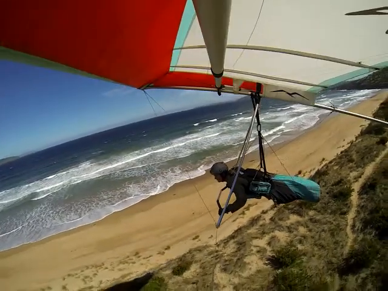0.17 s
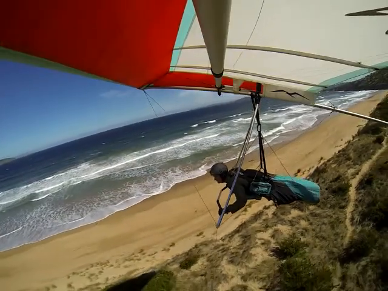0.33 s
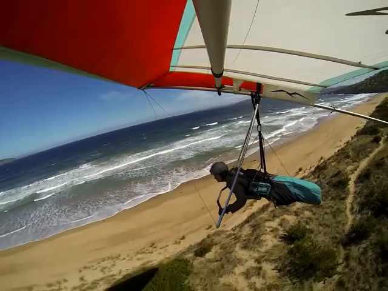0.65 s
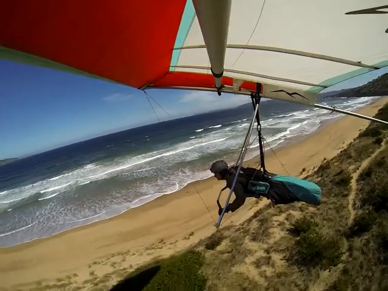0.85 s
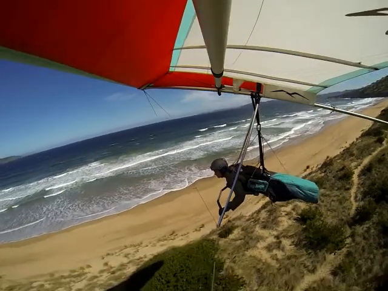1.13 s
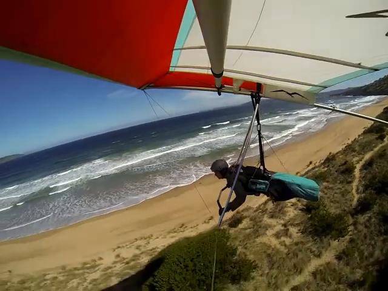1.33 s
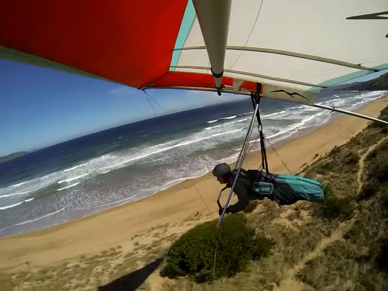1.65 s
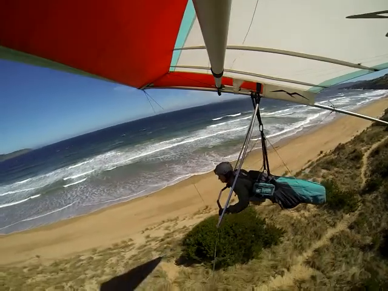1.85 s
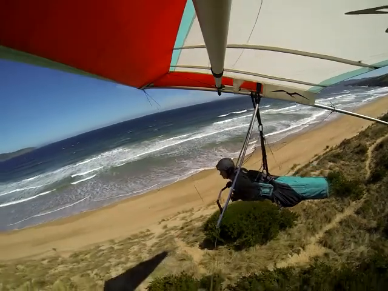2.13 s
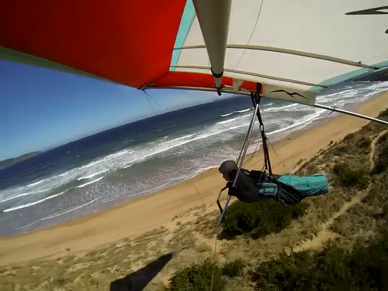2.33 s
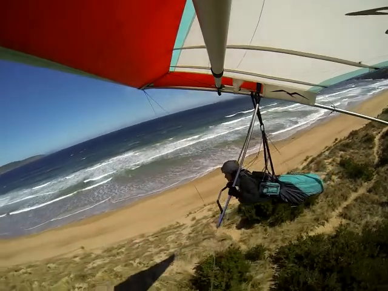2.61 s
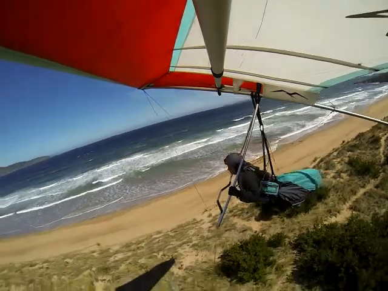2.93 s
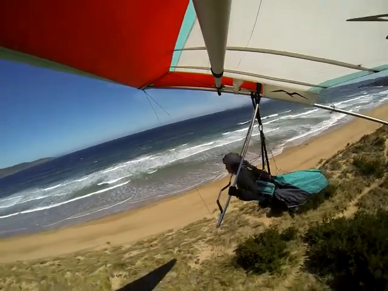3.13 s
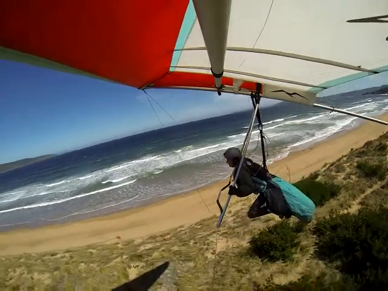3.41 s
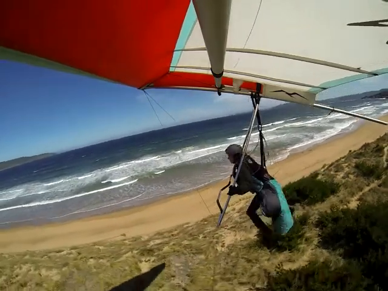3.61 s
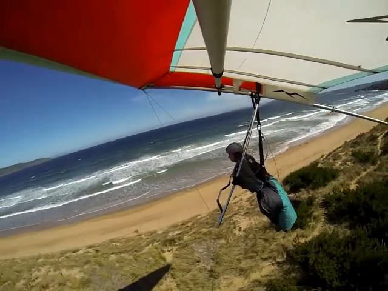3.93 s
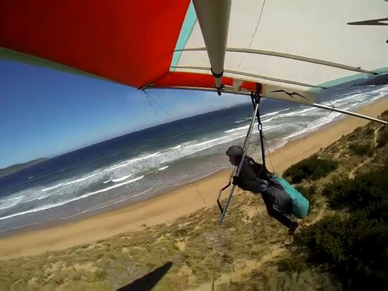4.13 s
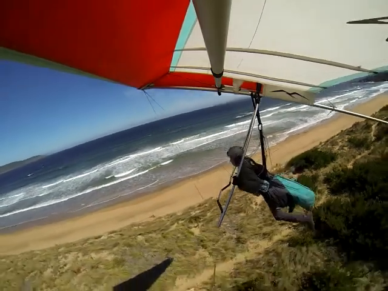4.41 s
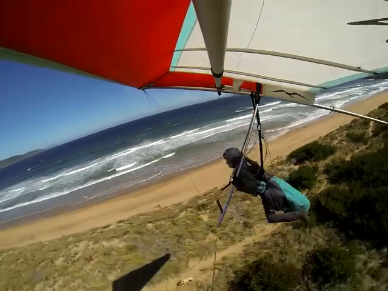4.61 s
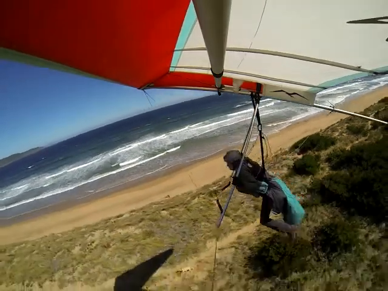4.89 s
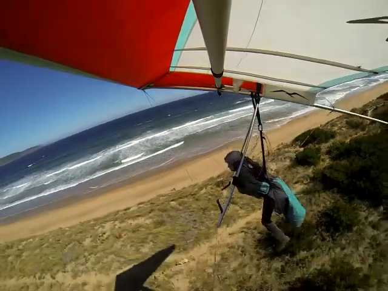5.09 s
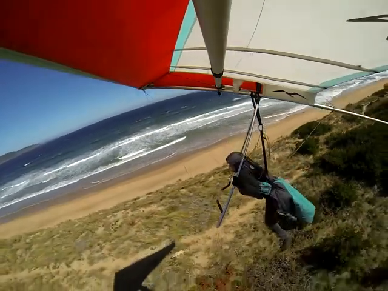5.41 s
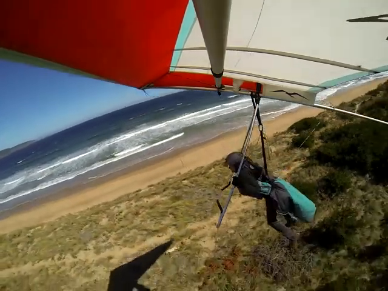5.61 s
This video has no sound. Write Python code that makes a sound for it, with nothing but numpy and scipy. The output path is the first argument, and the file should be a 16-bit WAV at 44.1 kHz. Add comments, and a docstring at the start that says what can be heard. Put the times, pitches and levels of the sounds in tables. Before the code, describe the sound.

A low wavering hum and muffled wind buffeting inside a closed camera housing on a hang glider, with sharp mount clacks and short stick-slip squeaks.

```python
"""Over a beach, a microphone in a closed camera housing rides on the boom of a soaring hang glider.
From the start the airflow swings the frame into a drone, buffets and hisses over the housing, loose
fittings chatter and the electronics whine faintly. From 0.6 s the pilot's shifts knock the mount: blows
ring its modes. From 1.2 s eddies slap the housing and the joint squeaks in short stick-slip strokes, sines
with uneven slips, two of them trailing off in a faint ringing tone; two thin sine chirps pass after 4 s."""
import sys
import numpy as np
from scipy import signal
from scipy.fft import rfft, irfft
from scipy.io import wavfile
from scipy.ndimage import uniform_filter1d, minimum_filter1d, map_coordinates

SR = 44100
rng = np.random.default_rng(int(sys.argv[2]) if len(sys.argv) > 2 else 0)


def put_to_file(sound):
    """Save the sound as 16-bit audio at rate SR, in the file named by the first command-line argument."""
    columns = np.atleast_2d(sound).T  # one column per channel
    safe = np.clip(columns, -1, 1)
    whole_steps = np.round(safe * 32767)
    wavfile.write(sys.argv[1], SR, whole_steps.astype(np.int16))


N = 253575
TIME = np.arange(N) / SR  # [s]

# swing of the frame: (time [s], level [dB])
DRONE_LEVEL = [(0.02, -7.5), (0.19, -7), (0.29, -20), (0.46, -10), (0.56, -25.5), (0.61, -15),
               (0.77, -10.5), (1.0, -23.5), (1.2, -20.5), (1.29, -38), (1.64, -35), (1.74, -20), (1.8, -34),
               (2.1, -21), (2.21, -37), (2.32, -19), (2.52, -19.5), (2.72, -36), (2.79, -18), (2.95, -14),
               (2.99, -32), (3.06, -15), (3.26, -15), (3.34, -40.5), (3.49, -18), (3.61, -17), (3.68, -33),
               (3.82, -30.5), (3.92, -13), (4.2, -18), (4.35, -10), (4.66, -14.5), (4.79, -23.5),
               (5.38, -16), (5.46, -27), (5.73, -13)]
# centre pitch of the swinging frame: (time [s], pitch [Hz])
DRONE_PITCH = [(0.05, 56.93), (0.6, 58.2), (1.02, 53.26), (1.15, 53.65), (1.23, 58.0), (1.58, 59.16),
               (2.06, 55.76), (2.16, 59.3), (3.72, 56.9), (3.81, 54.5), (3.94, 57.16), (5.7, 57.34)]
# slow eddies around the housing, before a common lift: (time [s], level [dB])
EDDY_LEVEL = [(0.05, -29), (0.77, -29), (0.92, -17), (1.21, -22), (1.31, -42), (2.41, -20), (2.54, -32.5),
              (2.87, -18), (3.87, -36), (4.47, -19.5), (4.5, -40), (5.09, -29.5), (5.2, -40), (5.7, -32)]
# airflow over the housing: (time [s], buffeting as gust strength [dB], air hiss before its lift [dB])
AIRFLOW = [(0.02, -38, -61.5), (0.43, -29, -64.5), (0.69, -36.5, -65.5), (1.05, -29.5, -64.5),
           (1.2, -31, -63.5), (1.34, -44, -77), (2.32, -38, -73), (2.45, -34.5, -70), (2.79, -34.5, -66),
           (2.96, -30, -64), (3.15, -27.5, -65), (3.3, -42.5, -73.5), (3.6, -41.5, -72),
           (4.03, -35.5, -71.5), (4.38, -38.5, -68.5), (4.68, -41, -73), (5.62, -42, -72.5),
           (5.73, -39, -67)]
# colour of the slow eddies: (frequency [Hz], level [dB])
EDDY_COLOUR = [(8, -18), (17, 0), (24, 9), (33, -9), (45, -11.5), (80, -35.5), (200, -99)]
# colour of the quicker buffets: (frequency [Hz], level [dB])
BUFFET_COLOUR = [(25, -15), (40, -2), (62, -3), (90, 4), (120, -3), (150, -17.5), (185, -3), (235, -11.5),
                 (285, -4), (330, -17.5), (400, -28.5), (520, -28), (700, -38), (1500, -48.5), (4000, -102)]
# colour of the air hiss inside the closed housing: (frequency [Hz], level [dB])
HISS_COLOUR = [(200, 20.5), (520, 14), (720, 21.5), (1100, 11.5), (1500, 20), (1850, 15), (2200, 6),
               (3000, 2.5), (3900, -1), (4400, -9.5), (5200, -6.5), (7000, -11), (10000, -18),
               (15000, -17.5)]
# colour of the loose fittings: (frequency [Hz], level [dB])
FITTINGS_COLOUR = [(300, -33), (560, -27.5), (720, -2.5), (980, -6.5), (1150, -16.5), (1420, 4.5),
                   (1600, -4), (1850, -13), (2200, -30.5), (3500, -57)]
# bouts of harder chatter: (time of the peak [s], rise [s], fall [s], level [dB])
BOUTS = [(.59, 0.05, .1, -38), (1.17, 0.13, 0.084, -30), (1.84, .04, 0.045, -26), (2.0, .06, 0.087, -40.5),
         (2.92, 0.21, .05, -37.5), (3.18, 0.18, .08, -45.5), (3.35, 0.045, .08, -41),
         (3.8, 0.027, 0.054, -30), (4.47, 0.04, .05, -43.5), (5.12, 0.063, .07, -47.5)]
# play taken up in the mount: (time [s], blow [dB], sharp edge re blow [dB], thud re blow [dB])
KNOCKS = [(0.577, -6.5, -46, -14), (1.053, -26, -36, -20), (1.315, -7.5, -30.5, -22.5),
          (1.323, -24, -7.5, -16.5), (1.793, -29.5, -33, -19), (1.807, -18.5, -41, -18.5),
          (1.974, -13, -48, -21), (2.325, -9.5, -38, -13), (2.38, -23, -46, 0.5), (2.496, -27.5, -5.5, -21),
          (2.807, -21.5, -42, -7.5), (3.06, -27.5, -17, 3.5), (3.275, -8, -38, -15),
          (3.578, -29, -20, -14.5), (3.776, -3, -40, -21), (3.789, -17, -34, -21), (3.844, -22, -42, -2),
          (3.935, -22.5, -36, -16), (4.026, -14, -24.5, -11), (4.189, -33, -34.5, -13.5),
          (4.335, -10, -22.5, -7), (4.413, -6.5, -46, -22), (4.462, -17, -18, -2), (4.497, -31, -17, -29),
          (4.529, -28.5, -12, -12.5), (4.554, -17, -27, -8.5), (4.868, -32, -36, -11),
          (5.024, -21, -24, -24.5), (5.035, -9.5, -38.5, -9.5), (5.07, -6.5, -41.5, -9.5),
          (5.314, -11, -29.5, -10), (5.394, -9, -46, -17), (5.64, -33.5, -41, -9)]
# colour of the mount's hollow clack: (frequency [Hz], level [dB])
CLACK_COLOUR = [(120, -25.5), (280, -4.5), (380, -17), (580, -26.5), (700, 1), (980, -6), (1120, -14.5),
                (1420, 10), (1780, -9), (2230, -23.5), (2550, -19.5), (3050, -47), (6000, -66.5),
                (12000, -72)]
# lasting modes of the mount and boom: (frequency [Hz], 60 dB decay [s], relative level [dB])
MOUNT_MODES = [(731, 0.37, -2), (848, 0.41, -9.5), (930, 0.16, -8.5), (1244, 0.32, -7), (1260, 0.13, -5.5),
               (1570, 0.14, -6.5), (1440, 0.11, -11.5), (1812, 0.14, -2), (1788, 0.35, -8.5),
               (2010, 0.16, -18), (1980, 0.17, -20), (2300, .1, -20)]
# low modes of the boom: (frequency [Hz], 60 dB decay [s], level [dB])
THUD_MODES = [(220, 0.043, -2.5), (280, 0.25, -1), (474, 0.12, -14.5)]
# colour of the sharp edge of hard contacts: (frequency [Hz], level [dB])
SNAP_COLOUR = [(1000, -13), (2700, 18.5), (3600, -0.5), (5700, -3.0), (9000, -17), (15000, -34.5)]
# eddies that slap the housing: (time [s], length [s], level [dB])
SLAPS = [(1.15, 0.1, -24), (2.796, .046, -21.5), (3.055, .055, -8), (3.115, .08, -23), (4.352, 0.041, -26),
         (4.433, 0.024, -18)]
# colour of the slaps: (frequency [Hz], level [dB])
SLAP_COLOUR = [(40, -13), (75, -14), (115, 13), (150, 1), (200, 3), (270, 2.5), (340, -24.5), (600, -41),
               (1500, -82)]
# stick-slip strokes of the joint, and two faint tones (4.607, 5.448 s) that ring on as a squeak trails
# off: (time [s], length [s], mid pitch [Hz], glide [Hz], starting level [dB], swell [dB],
# starting roughness [0-1], half-pitch re tone [dB])
SQUEAK_TONES = [ (1.209, 0.016, 1540, -90.5, -19.5, -3.5, .3, -30),
                (1.229, 0.0076, 1400, -140, -3.5, 6.5, 0.18, -24),
                (1.241, 0.016, 1478, 170.5, -5.5, -1.5, 0.49, -6),
                (1.262, 0.03, 1382, -89, -1.5, -19.5, 0.37, -7.5),
                (1.316, .045, 1505, -0.5, -5.5, -6.5, 0.08, -26.5),
                (1.363, .012, 1363, -60, -16, -8, 0.17, -17),
                (1.806, 0.0085, 1549, 40.5, -2, -8.5, 0.45, -7.5),
                (1.817, 0.038, 1990, 219, -20.5, 0, 0.29, 8.5),
                (1.851, 0.013, 1630, -70.5, -7, -4, 0.47, -9),
                (1.864, .093, 1680, 129.5, -8.5, -5, 0.23, -3.5),
                (1.975, 0.037, 1730, -21, -13.5, -23, 0.04, -16),
                (2.496, 0.0087, 1427, -33, -17.5, -10.5, 0.11, -11.5),
                (2.812, .055, 1446, 79, -34, -8.5, 0.28, -19), (2.915, 0.036, 1496, -77, -28, 4, .55, -5.5),
                (3.108, 0.035, 1400, -2.5, -20, -13.5, 0.28, -18),
                (3.278, 0.025, 1424, 41.5, -5, -2.5, 0.48, -15.5),
                (3.306, 0.0241, 1472, 40.5, -0.5, -18.5, 0.07, -29),
                (4.027, 0.0091, 1375, 0.5, -3, -7.5, .14, -19),
                (4.04, 0.059, 1400, -0.5, -18, -7, 0.18, -17),
                (4.414, .03, 1418, -50, -14, -9.5, 0.38, -3.5),
                (4.461, 0.01, 1345, -71, -1, -5.5, 0.32, -27), (4.477, 0.015, 1360, 29, -4, -7.5, 0.2, -32),
                (4.528, 0.011, 1341, -100, -14, -15, 0.5, -33.5),
                (4.558, .012, 1428, -100, -22.5, -2.5, .6, -16),
                (4.571, 0.032, 1325, 171, -14.5, -9.5, 0.38, -32.5),
                (4.607, 0.13, 1257, 11.5, -42, -15, 0, -27),
                (5.036, 0.014, 1305, -51.5, -3.5, -6.5, 0.39, -28.5),
                (5.053, .026, 1385, 20.5, -16, 3.5, .8, -8.5), (5.089, 0.0098, 1355, 40, -8.5, -4, .6, -13),
                (5.106, 0.032, 1342, 62.5, -9.5, -5.5, .6, -15),
                (5.138, 0.021, 1377, -38.5, -4, -10, 0.19, -11),
                (5.316, 0.07, 1394, -8.5, -7.5, -24.5, 0.28, -19), (5.402, .021, 1342, 34, -17, 1, .7, -7),
                (5.426, 0.013, 1906, -33, -28.5, -1.5, 0.12, 6.5),
                (5.437, .011, 1425, -2, -28, -10.5, 0.51, 12), (5.448, 0.063, 1870, -24, -56, -8, 0, 19.5)]
# colour of the rubbing faces: (frequency [Hz], level [dB])
GRIT_COLOUR = [(1500, -20.5), (2800, 3.5), (3900, 5), (4500, -9.0), (5800, -4), (7000, -21), (12000, -36.5)]
# thin chirps: (time [s], length [s], first pitch [Hz], last pitch [Hz], level [dB])
CHIRPS = [(4.064, 0.049, 5450, 5270, -53), (4.41, 0.02105, 5567, 5633, -54)]

CRUISE_DB = -37  # gust strength in steady flight
# level in steady flight [dB] and growth with the gust [dB per dB]
BUFFET_DB, BUFFET_GROWTH = -32, 1.12
RATTLE_DB, RATTLE_GROWTH = -53, .8
PICTURE_RATE_HZ, WHINE_HZ = 47.95, 6476
REBOUND_S, REBOUND_DB = 0.01, -15.5  # longest delay and relative level of a knock's one bounce
END_CLACK_DB = -16  # clack at the end of a squeak tone, re its level there
TONE_ATTACK_S, TONE_RELEASE_S = 0.006, .004
SAG_S, SAG_SHARE = .007, .07  # share by which the pitch of a long squeak tone sags at its end
FULL_SAG_S = 0.057  # shorter tones sag in proportion to their length
FREEING_S = 0.082  # the grip loosens as the joint slides: the roughness dies away
HALF_FADE_DB_PER_S, HALF_LAST_S = 63, 0.052  # the half pitch fades and then stops
RATCHET_HZ, RATCHET_DB = 55, 5.5  # mean rate and full-roughness depth of the jerks that throb the squeak
TOP_HZ = 15800


def undb(db):
    """Decibels to gain."""
    return 10 ** (np.asarray(db) / 20)


def unit(x):
    """Scale to rms 1."""
    return x / np.sqrt(np.mean(x ** 2))


def curves(table):
    """The columns of a table, joined by straight lines in time."""
    times, *columns = np.transpose(table)
    return [np.interp(TIME, times, column) for column in columns]


def walk(rate):
    """Smooth random wander of rms 1, with rate new values a second."""
    values = rng.standard_normal(N // 8)
    return unit(map_coordinates(values, [TIME * rate], order=3, mode="wrap"))


def response(colour):
    """Causal, minimum-phase impulse response with the given (Hz, dB) colour."""
    hz, db = np.transpose(colour)
    size = 16384
    grid = np.maximum(np.arange(size // 2 + 1) * SR / size, 1)
    gain = undb(np.interp(np.log(grid), np.log(hz), db))
    cepstrum = irfft(np.log(gain))
    # folding the cepstrum onto positive time puts the energy as early as it can be
    cepstrum[1:size // 2] *= 2
    cepstrum[size // 2 + 1:] = 0
    return irfft(np.exp(rfft(cepstrum)))


def through(x, impulse):
    """Pass a sound through an impulse response."""
    return signal.fftconvolve(x, impulse)[:N]


def noise(colour):
    """Coloured noise of rms 1."""
    return unit(through(rng.standard_normal(N), response(colour)))


def steady(x, span_s):
    """Even out the swells of a noise that last longer than span_s."""
    power = uniform_filter1d(x ** 2, max(int(span_s * SR), 2))
    return x / np.sqrt(power + 1e-9)


def ticks(rate, scatter_db):
    """Random tiny impacts of uneven size, rate a second on average, rms 1."""
    hits = rng.random(N) < rate / SR
    size = rng.standard_normal(N)
    scatter = undb(scatter_db * np.clip(rng.standard_normal(N), -2, 2))
    return unit(hits * size * scatter)


def resonance(x, hz, width_hz):
    """One resonance, gain 1 at its centre."""
    return signal.lfilter(*signal.iirpeak(hz, hz / width_hz, fs=SR), x)


def ringing(modes, t):
    """Decaying sines of a table of modes."""
    return sum(undb(db - 60 * t / t60) * np.sin(2 * np.pi * hz * t) for hz, t60, db in modes)


def drone():
    """Shed vortices keep one mode of the frame swinging; its pitch wanders slightly."""
    (level_db,), (hz,) = curves(DRONE_LEVEL), curves(DRONE_PITCH)
    phase = 2 * np.pi * np.cumsum(hz * (1 + .012 * walk(13))) / SR
    swing = unit(np.sin(phase) + undb(-38.0) * np.sin(3 * phase))
    return undb(level_db + 1.9 * walk(16)) * swing


def airflow():
    """Gust strength above steady flight and level of the hiss before its lift, both in dB."""
    buffet_db, hiss_db = curves(AIRFLOW)
    return buffet_db - CRUISE_DB, hiss_db


def eddies():
    """Slow eddies shake the housing: low noise with a wandering level."""
    level_db = curves(EDDY_LEVEL)[0] + 1.0 + 3.7 * walk(12)
    return undb(level_db) * steady(noise(EDDY_COLOUR), .1)


def buffets():
    """Quicker buffets shake the housing harder as the gust grows."""
    gust_db, _ = airflow()
    level_db = BUFFET_DB + BUFFET_GROWTH * gust_db + 1.3 * walk(14)
    return undb(level_db) * steady(noise(BUFFET_COLOUR), .06)


def hiss():
    """Turbulent air hisses over the closed housing, which muffles its treble."""
    _, hiss_db = airflow()
    return undb(hiss_db + 19.5 + 1.0 * walk(40)) * noise(HISS_COLOUR)


def rattle():
    """Loose fittings chatter all the time, harder in gusts and in a few bouts that swell and die."""
    gust_db, _ = airflow()
    strength = undb(RATTLE_DB + RATTLE_GROWTH * gust_db + 1.5 * walk(12))
    for peak_s, rise, fall, db in BOUTS:
        width = np.where(TIME < peak_s, rise, fall)
        strength = strength + undb(db) * np.exp(-((TIME - peak_s) / width) ** 2 * 2)
    impacts = ticks(rate=810, scatter_db=0.0)
    return strength * steady(through(impacts, response(FITTINGS_COLOUR)), 0.19)


def whine():
    """The electronics sing a tone and its octave faintly in bursts, once for each picture."""
    _, hiss_db = airflow()
    burst = np.maximum(np.sin(2 * np.pi * PICTURE_RATE_HZ * TIME), 0)
    phase = 2 * np.pi * np.cumsum(WHINE_HZ * (1 + 0.0012 * walk(300))) / SR
    return undb(hiss_db - 1.0) * burst * (np.sin(phase) + np.sin(2 * phase))


def mount(ring_db, shiver_db, shiver_t60):
    """The mount's answer to a blow: a hollow clack of peak 1, lasting modes and a shiver of loose parts."""
    clack = response(CLACK_COLOUR)
    # bending waves spread out on their way along the boom, so the clack takes a few cycles to build
    clack = clack - 2 * resonance(clack, hz=1580, width_hz=2200)
    clack = clack / np.abs(clack).max()
    t = TIME[:len(clack)]
    dying_noise = rng.standard_normal(len(t)) * undb(-60 * t / shiver_t60)
    shiver = signal.fftconvolve(dying_noise, clack)[:len(t)] / np.linalg.norm(clack)
    return clack + undb(ring_db) * ringing(MOUNT_MODES, t) + undb(shiver_db) * shiver


def knocks(body):
    """Play taken up in the mount clacks and rebounds; hard contacts add an edge, heavy ones a boom thud."""
    blows, shoves, edge = np.zeros((3, N))
    for start, blow_db, edge_db, thud_db in KNOCKS:
        rebound = start + REBOUND_S * rng.uniform(.8, 1.0)
        for s, db in (start, blow_db), (rebound, blow_db + REBOUND_DB):
            i = int(s * SR)
            blows[i] += undb(db)
            shoves[i] += undb(db + thud_db)
            age = TIME[:SR // 20] / 0.0011  # the edge peaks 1.1 ms after contact
            edge[i:i + len(age)] += (undb(db + edge_db) * age * np.exp(1 - age))[:N - i]
    # the joint catches again as a stroke stalls, and clacks; the faint ringing tones end in a far weaker one
    for s, length, _, _, db, swell_db, _, _ in SQUEAK_TONES:
        blows[int((s + length) * SR)] += undb(db + swell_db + END_CLACK_DB)
    # plastic contacts give way a little, which rounds the push
    push = np.hanning(max(int(0.00029 * SR), 3))
    clack = through(through(blows, push / push.sum()), body)
    snap = edge * noise(SNAP_COLOUR)
    thud = through(shoves, ringing(THUD_MODES, TIME[:len(body)]))
    return undb(1.5) * clack + undb(-4) * snap + thud


def slaps():
    """A few eddies slap the housing: low noise that swells fast and dies more slowly."""
    strength = np.zeros(N)
    for s, length, db in SLAPS:
        progress = np.clip((TIME - s) / length, 0, 1)
        strength += undb(db) * np.sin(np.pi * progress ** .5) ** 2
    return strength * steady(noise(SLAP_COLOUR), .04)


def squeak_controls():
    """Pitch, gain, roughness and half-pitch share: strokes slide free of their grip, and every tone sags."""
    gain, rough, half = np.zeros((3, N))
    hz = np.full(N, float(SQUEAK_TONES[0][2]))
    for s, length, pitch_hz, glide_hz, db, swell_db, roughness, half_db in SQUEAK_TONES:
        span = slice(int(s * SR), min(int((s + length + .05) * SR), N))  # 50 ms for the release
        age = TIME[:span.stop - span.start]
        held = np.minimum(age, length)  # age, stopped at the end of the tone
        sag = np.exp((held - length) / SAG_S)
        glide = pitch_hz + glide_hz * (held / length - .5)
        hz[span] = glide * (1 - SAG_SHARE * sag * min(length / FULL_SAG_S, 1))
        attack = np.minimum(age / TONE_ATTACK_S, 1)
        envelope = attack * np.exp((held - age) / TONE_RELEASE_S)
        rough[span] = np.clip(roughness, 0, 1) * np.exp(-held / FREEING_S)
        # a rough joint moves in jerks
        jerks = np.sin(2 * np.pi * RATCHET_HZ * age * rng.uniform(0.79, 1.15))
        level_db = db + swell_db * held / length + RATCHET_DB * rough[span] * jerks
        gain[span] = np.maximum(gain[span], undb(level_db) * envelope)
        half[span] = undb(half_db - HALF_FADE_DB_PER_S * held) / (1 + (held / HALF_LAST_S) ** 8)
    soften = np.hanning(int(0.0051 * SR))
    return [signal.fftconvolve(c, soften / soften.sum(), "same") for c in (hz, gain, rough, half)]


def squeaks(body):
    """The joint sticks and slips: clean as it glides, skipping every other cycle and chattering as it grips."""
    hz, gain, rough, half = squeak_controls()
    # a rough grip makes the slips uneven in timing and in size
    phase = 2 * np.pi * np.cumsum(hz * (1 + .08 * rough * walk(600))) / SR
    overtones = undb(-42) * np.sin(2 * phase) + undb(-59) * np.sin(3 * phase) + undb(-67.5) * np.sin(4 * phase)
    tone = (np.sin(phase) + overtones) * undb(1.2 * rough * walk(320))
    half_pitch = np.sin(phase / 2) + undb(-27.5) * np.sin(3 * phase / 2)
    skips = half * half_pitch * undb(0.83 * rough * walk(260))
    squeal = np.sqrt(2) * gain * (tone + skips)
    # the octave of low, hard strokes meets a resonance of the housing
    octave = gain * np.sqrt(np.abs(rough)) * np.sin(2 * phase)
    edge = resonance(resonance(octave, hz=2495, width_hz=140), hz=2495, width_hz=140)
    # each catch jolts the mount and makes the boom groan; the rubbing faces hiss
    jolts = gain * rough * ticks(rate=1800, scatter_db=4.5)
    chatter = through(jolts, body) / np.linalg.norm(body)
    groan = resonance(resonance(jolts, hz=269, width_hz=86), hz=269, width_hz=86)
    grit = gain * rough * noise(GRIT_COLOUR)
    # the boom rings on with whatever pitch it was given
    late_body = body * (1 - np.exp(-TIME[:len(body)] / 0.028))
    afterring = through(squeal, late_body)
    rubbing = undb(-2.0) * chatter + undb(4.0) * groan + undb(-42.5) * grit
    return undb(-2.5) * squeal + undb(-8.5) * edge + rubbing + undb(-44.0) * afterring


def chirps():
    """Thin, high sine chirps, one gliding down and one up, with a slight flutter of pitch."""
    out = np.zeros(N)
    for s, length, first_hz, last_hz, db in CHIRPS:
        i, n = int(s * SR), int(length * SR)
        hz = np.linspace(first_hz, last_hz, n) * (1 + .008 * walk(500)[:n])
        out[i:i + n] += undb(db) * np.hanning(n) * np.sin(2 * np.pi * np.cumsum(hz) / SR)
    return out


def scene():
    """Everything reaches the one microphone through the mount and housing."""
    body = mount(ring_db=-26.5, shiver_db=-8.0, shiver_t60=0.068)
    wind = eddies() + buffets() + hiss() + slaps()
    joint = knocks(body) + squeaks(body)
    return (drone() + wind + rattle() + whine() + joint + chirps())[None]


def record(dry):
    """The camera dips its gain briefly to hold peaks under full scale, then cuts the top."""
    room = minimum_filter1d(np.minimum(1, .95 / (np.abs(dry) + 1e-9)), size=257)
    gain = uniform_filter1d(uniform_filter1d(room, size=129), size=129)
    top_cut = signal.ellip(8, .2, 70, TOP_HZ, fs=SR, output="sos")
    return signal.sosfilt(top_cut, dry * gain)


dry = scene()
out = record(dry)
put_to_file(out)
```